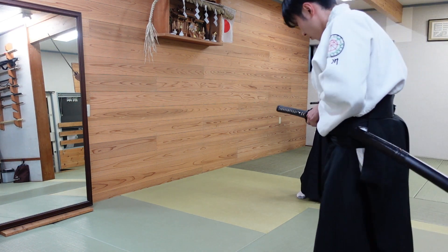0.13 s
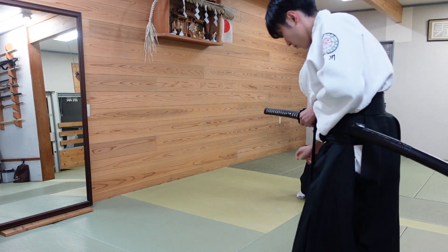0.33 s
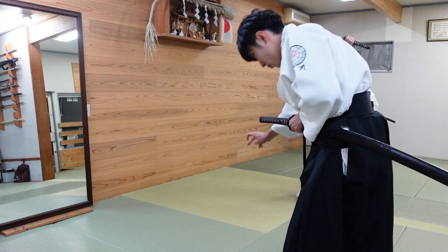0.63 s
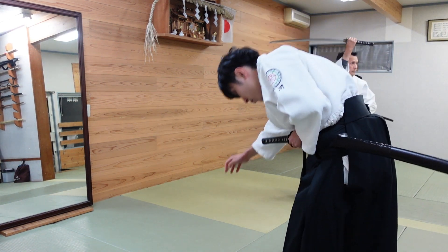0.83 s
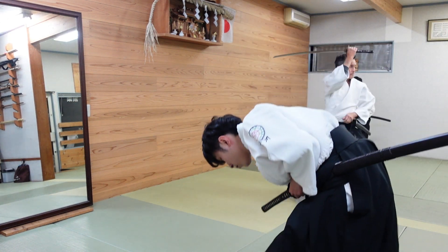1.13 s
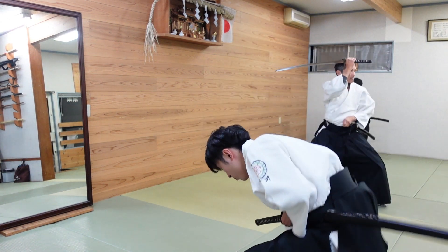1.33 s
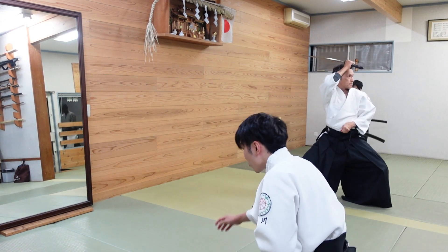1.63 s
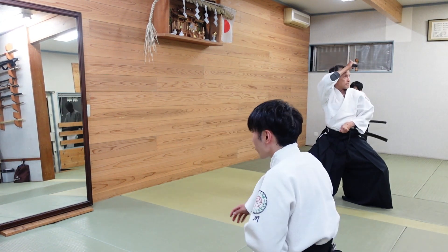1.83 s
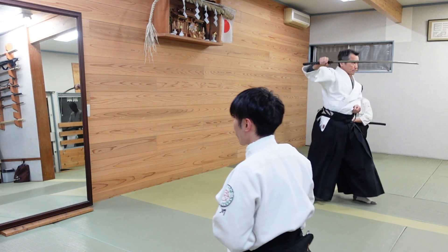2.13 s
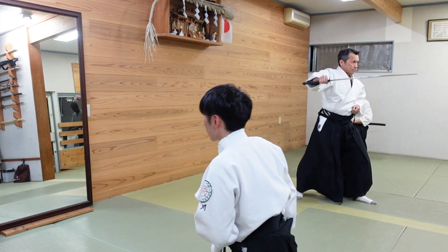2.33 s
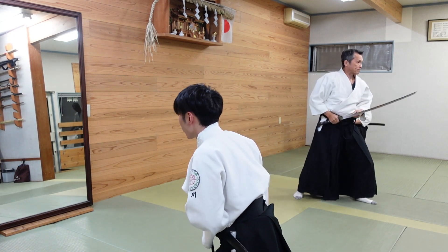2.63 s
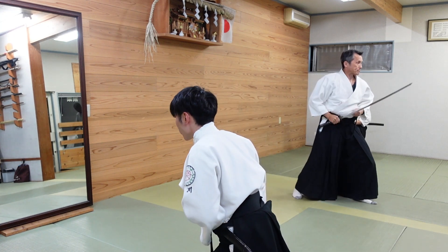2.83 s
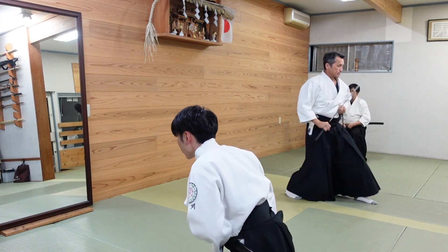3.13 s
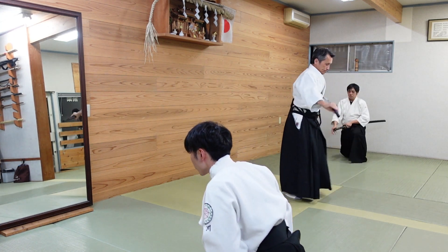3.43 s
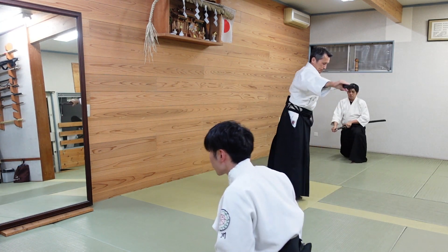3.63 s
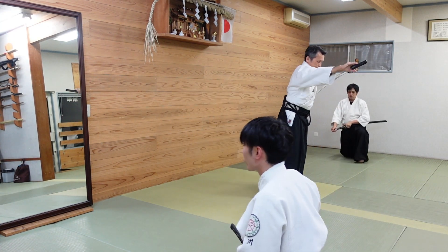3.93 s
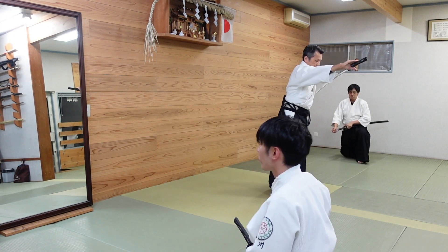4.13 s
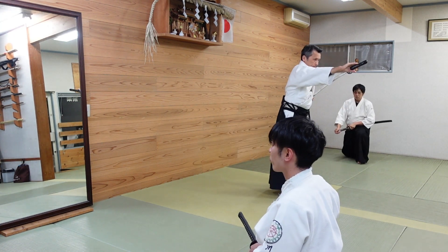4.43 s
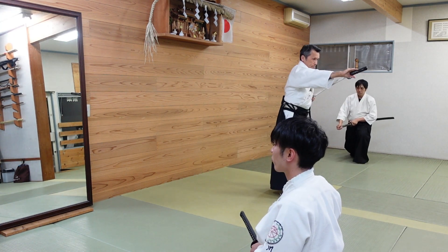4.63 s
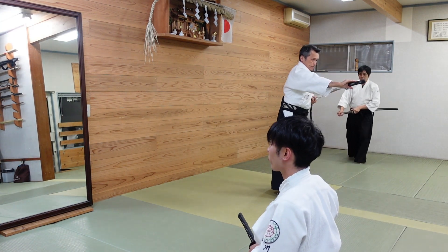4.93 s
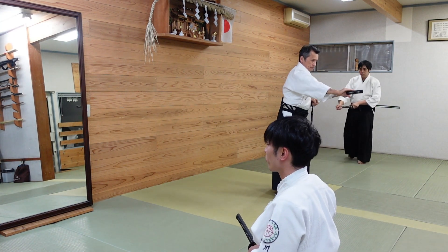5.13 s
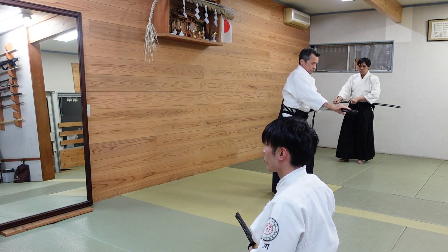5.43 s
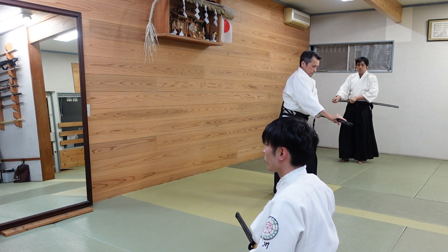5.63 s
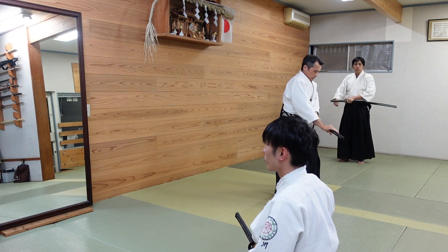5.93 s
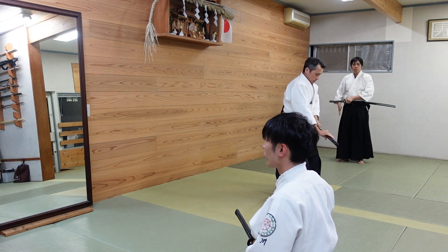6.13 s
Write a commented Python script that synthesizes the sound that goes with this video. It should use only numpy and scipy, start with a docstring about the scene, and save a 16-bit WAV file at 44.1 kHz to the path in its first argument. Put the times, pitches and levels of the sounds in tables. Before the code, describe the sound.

Close stereo pickup of sword practice on mats: small ticks and foot scuffs, a brief metallic chatter, then billowing trousers and a muffled body landing. A hissing foot slide, a sharper blade scrape with a fading metallic rasp, and a strong mat slide come next. Soft cloth flapping, quiet gaps and a final swish with padded pats end it, over low airy ventilation in a small live room.

```python
"""Feet hiss over woven mats and cloth rustles, as sword practice goes on in a small, quiet training hall.
Wide trousers flap, sleeves swish and bodies land softly: grainy noise or filtered bumps, swelling and fading.
A blade scrapes and ticks at its scabbard: chattering noise through metal resonances, cracks, a short squeak.
Low room modes and a brief stereo tail make the hall; filtered noise and a faint hum are its ventilation."""
import sys
import numpy as np
from scipy import signal
from scipy.fft import rfft, irfft, next_fast_len
from scipy.io import wavfile
from scipy.ndimage import uniform_filter1d

SR = 44100
rng = np.random.default_rng(int(sys.argv[2]) if len(sys.argv) > 2 else 0)


def dump_mix(stems):
    """Bounce the given channels to the path in sys.argv[1] as a 16-bit WAV at rate SR."""
    frames = np.atleast_2d(stems).T  # one column per channel
    limited = np.clip(frames, -1, 1)  # hard clip at full scale
    pcm = np.round(limited * 32767).astype(np.int16)
    wavfile.write(sys.argv[1], SR, pcm)


N = 277830
TIME = np.arange(N) / SR   # s
STROKE_TIME = np.arange(2 ** 15) / SR   # time axis of one movement, s
STROKE_SIZE = len(STROKE_TIME)
# spectrum of cloth rubbing on cloth: hz, level_db (per Hz)
CLOTH_SPECTRUM = [(240, -46), (400, -30), (481, -36), (643, -19), (900, -11), (2190, 3.5), (2360, -0.5),
                  (2790, 1.5), (7320, -4), (15500, -19.5)]


def from_db(db):
    """Decibels to gain."""
    return 10 ** (np.asarray(db) / 20)


def rms_one(x):
    """Scale to unit power."""
    return x / np.sqrt(np.mean(x ** 2) + 1e-20)


def at_hz(points, hz):
    """Read a table on a log-frequency axis."""
    table_hz, values = np.transpose(points)
    return np.interp(np.log(hz + 1), np.log(table_hz), values)


def gain_curve(rows):
    """Gain at every sample from (s, dB) rows."""
    return from_db(np.interp(TIME, *np.transpose(rows)))


def shaped(x, spectrum, tilt_db=0):
    """Give a noise a spectrum, tilted in the treble by about so many dB per octave."""
    size = next_fast_len(len(x))
    hz = np.arange(size // 2 + 1) * SR / size
    level_db = at_hz(spectrum, hz) + tilt_db * np.log2(1 + hz / 1000)
    return irfft(rfft(x, size) * from_db(level_db), size)[:len(x)]


def resonance(x, hz, width_hz):
    """Two-pole resonance with about unit gain on top."""
    r = np.exp(-np.pi * width_hz / SR)
    feed = np.array([1, 0, -1]) * (1 - r * r) / 2
    return signal.lfilter(feed, [1, -2 * r * np.cos(2 * np.pi * hz / SR), r * r], x)


def resonances(x, modes):
    """Sum of parallel resonances from (Hz, width Hz, dB) rows."""
    return sum(from_db(db) * resonance(x, hz, width_hz) for hz, width_hz, db in modes)


def band_filter(low_hz, high_hz):
    """Gentle band-pass filter."""
    return signal.butter(2, [low_hz, high_hz], "band", fs=SR, output="sos")


def add(track, s, sound):
    """Mix a sound into a track from time s on."""
    start = max(int(s * SR), 0)
    track[start:start + len(sound)] += sound[:N - start]


def friction(size, per_s, grain_db):
    """Countless fibres slip as a smooth hiss; at random a thread catches and lets go with a snap."""
    snaps = (rng.random(size) < per_s / SR) * rng.standard_normal(size)
    return rms_one(rng.standard_normal(size) + from_db(grain_db) * rms_one(snaps))


def stroke(swell_s, fade_s):
    """Speed of one movement: it builds up in a straight line, then eases off along a bell curve."""
    swell_s, fade_s = max(swell_s, 1e-3), max(fade_s, 1e-3)
    build_up = np.minimum(STROKE_TIME / swell_s, 1)
    easing = np.minimum(np.maximum(STROKE_TIME - swell_s, 0) / fade_s, 9)
    return build_up * np.exp(-easing ** 2)


def rub_stroke(swell_s):
    """Speed of a rubbing movement: one that gathers speed slowly also eases off slowly."""
    shortest_fade_s, fade_per_swell = 0.024, 2.04
    return stroke(swell_s, shortest_fade_s + fade_per_swell * swell_s)


def spread(mid, side, width_db):
    """Diffuse sound at two close microphones: alike in the bass, wider in the treble."""
    # stereo width: hz, side_minus_mid_db (before width_db is added)
    width_curve = [(60, -24), (130, -22), (250, -13.5), (500, -7), (1000, -7), (2200, -6.5), (4400, -7),
                   (8000, -7), (15000, -6.5)]
    return mid + from_db(width_db) * shaped(side, width_curve) * np.array([[1], [-1]])


def flaps():
    """A falling panel of cloth pushes air in a dull, lumpy puff while its folds rub."""
    # heavy cloth billowing and settling on the mat: start_s, swell_s, air_push_db, push_centre_hz, rubbing_db
    billows = [(1.135, 0.027, -33, 860, -34), (1.18, 0.029, -27, 550, -30), (1.385, 0.017, -41.5, 405, -39),
               (1.569, .014, -29.5, 970, -35), (2.167, 0.0068, -36, 1500, -25),
               (3.995, .017, -31.5, 530, -31), (4.035, 0.013, -27.5, 534, -32.5),
               (4.07, 0.016, -41, 454, -38.5)]
    fade_per_swell = 1.75   # cloth takes this much longer to settle than to billow
    dull = band_filter(230, 1800)
    out = np.zeros(N)
    for s, swell_s, push_db, hz, rub_db in billows:
        push = resonance(friction(STROKE_SIZE, per_s=300, grain_db=3.0), hz, 1.08 * hz)
        push = signal.sosfilt(dull, push)
        rub = shaped(friction(STROKE_SIZE, per_s=680, grain_db=-7.0), CLOTH_SPECTRUM, tilt_db=0.4)
        cloth = from_db(push_db) * rms_one(push) + from_db(rub_db) * rms_one(rub)
        add(out, s, stroke(swell_s, fade_per_swell * swell_s) * cloth)
    return out


def slides():
    """A sole drags over the ribs of the mat; the hiss gathers round a centre pitch given for each slide."""
    # feet sliding over the weave: start_s, swell_s, level_db, hiss_centre_hz
    drags = [(0.0, 0.003, -34, 1750), (.043, .004, -36, 1850), (.281, .004, -44.5, 2860),
             (2.043, 0.0089, -33, 5350), (2.091, 0.012, -30.5, 4800), (2.128, 0.027, -25.5, 3800),
             (2.145, 0.029, -37, 1660), (2.914, 0.0093, -30.5, 3100), (2.939, 0.003, -38.5, 1040),
             (3.277, 0.033, -21.5, 2600), (3.334, .014, -24.5, 2260), (3.481, 0.012, -34.5, 1348)]
    # spectrum of the slide hiss: hz, level_db (per Hz)
    hiss_spectrum = [(240, -47), (450, -45), (700, -24), (900, -6.5), (1300, -8), (2600, -12), (4400, -8.5),
                     (7000, -8), (10000, -14.5), (15500, -25)]
    # narrow resonances colouring the slide hiss: pitch_hz, width_hz, level_db
    hiss_modes = [(1435, 78, 4), (1635, 150, 4.5), (1830, 120, 6), (2236, 87, 4.5), (2490, 260, 2.5),
                  (2760, 110, -19), (3070, 110, -5), (3950, 110, -10), (4250, 100, -11.5)]
    # a lower hiss is more focused: emphasis of its centre at 2 kHz, and the change per octave
    focus_at_2k_db, focus_db_per_octave = 6, -5
    out = np.zeros(N)
    for s, swell_s, db, hz in drags:
        focus_db = focus_at_2k_db + focus_db_per_octave * np.log2(hz / 2000)
        hiss = shaped(friction(STROKE_SIZE, per_s=1200, grain_db=-3.5), hiss_spectrum)
        hiss = hiss + resonances(hiss, hiss_modes)
        centre = resonance(resonance(hiss, hz, 0.59 * hz), hz, 1.62 * hz)
        hiss = rms_one(hiss) + from_db(focus_db) * rms_one(centre)
        add(out, s, from_db(db) * rub_stroke(swell_s) * rms_one(hiss))
    return out


def swishes():
    """Cotton brushing on cotton: broad, finely grained friction noise, each brush with its own brightness."""
    # sleeves and jackets brushing: start_s, swell_s, level_db, brightness_db_per_octave
    brushes = [(.086, 0.0022, -35, 10), (1.127, 0.0089, -35, 9), (1.54, .004, -32, -0.5),
               (1.68, 0.01, -36, 2), (1.923, 0.0032, -42, 2), (2.679, 0.007, -38.5, -16),
               (2.759, 0.014, -40, -7.5), (3.883, 0.0067, -35.5, 9), (4.345, 0.011, -39.5, 4.5),
               (5.081, 0.0046, -41.5, -3), (5.277, 0.02, -25.5, 1), (5.31, 0.039, -29.5, 1.3)]
    out = np.zeros(N)
    for s, swell_s, db, tilt_db in brushes:
        hiss = shaped(friction(STROKE_SIZE, per_s=920, grain_db=-2.0), CLOTH_SPECTRUM, tilt_db)
        add(out, s, from_db(db) * rub_stroke(swell_s) * rms_one(hiss))
    return out


def scrapes():
    """The blade chatters along the scabbard mouth, and the chatter drives that sword's resonances."""
    # a blade rubbing or rattling in its scabbard:
    # start_s, fade_s, level_db, brightness_db_per_octave, sword (0 or 1)
    rubs = [(.475, 0.03, -24.5, 5.5, 0), (.498, 0.019, -23.5, 3.5, 0), (.525, 0.037, -32.5, 1, 0),
            (2.678, 0.02, -32, 3.5, 1), (2.775, 0.047, -38, 3.5, 1), (3.159, .022, -21, -2, 1),
            (3.185, 0.26, -29.5, -2.5, 1)]
    # spectrum of the rasp: hz, level_db (per Hz)
    rasp_spectrum = [(710, -51), (1200, -22), (1650, -3.5), (3350, -5), (3690, -8), (6110, 2), (7570, -8.5),
                     (10100, -6), (15500, -40)]
    # resonances of the two swords, one list each: pitch_hz, width_hz, level_db
    sword_modes = [
        [(1684, 40, -5.5), (2580, 44, -11), (3330, 82, 4.5), (3600, 110, 1.5), (3830, 73, 5), (4960, 40, 4),
         (5460, 50, -12), (5300, 30, 4), (5884, 50, 10), (5910, 55, 1), (6600, 45, -1), (8140, 80, -8),
         (8430, 250, -4), (9300, 60, -13), (9850, 46, -1), (10400, 110, -11), (11160, 80, -19)],
        [(2000, 31, -1), (3020, 150, 2.5), (3450, 100, 6), (4240, 140, 2.5), (4640, 72, -2), (5300, 38, -6),
         (6150, 78, -14), (6750, 55, -25), (9800, 110, -26), (11200, 80, -8)],
    ]
    swell_s = 0.0038
    out = np.zeros(N)
    for s, fade_s, db, tilt_db, sword in rubs:
        chatter = friction(STROKE_SIZE, per_s=680, grain_db=0.5)
        ring = resonances(chatter, sword_modes[int(sword > .5)])
        rasp = shaped(chatter, rasp_spectrum)
        metal = rms_one(rasp) + from_db(1) * rms_one(ring)
        metal = shaped(metal, [(1, 0)], tilt_db)   # flat spectrum, tilted only
        add(out, s, from_db(db) * stroke(swell_s, fade_s) * rms_one(metal))
    return out


def ticks():
    """Each tick is a noise crack of a millisecond or so through a broad resonance."""
    # sword fittings and snapping folds: start_s, peak_db, centre_hz
    cracks = [(.022, -17, 2930), (.047, -13.5, 1660), (0.0874, -16.5, 2780), (1.543, -15.5, 3330),
              (1.571, -15, 1220), (1.599, -23, 1430), (2.096, -15.5, 4000), (2.176, -12.5, 3750),
              (3.171, -15, 3900), (3.357, -14, 2500)]
    decay_s = 0.0018
    out = np.zeros(N)
    for s, db, hz in cracks:
        crack = rng.standard_normal(STROKE_SIZE) * np.exp(-np.minimum(STROKE_TIME / decay_s, 60))
        crack = resonance(resonance(crack, hz, 1.0 * hz), hz, 0.94 * hz)
        add(out, s, from_db(db) * crack / np.abs(crack).max())
    return out


def squeak(s=1.125, swell_s=0.002, fade_s=0.0273, hz=5650, end_hz=5270, level_db=-26):
    """A brief stick-slip squeak of the sword gear as its wearer kneels: a rough, jittered tone that sags."""
    out = np.zeros(N)
    sag_hz = np.interp(STROKE_TIME, [0, swell_s + fade_s / 2], [hz, end_hz])
    pitch_hz = sag_hz * (1 + 0.34 * rng.standard_normal(STROKE_SIZE))   # jitter on every sample
    tone = np.sin(2 * np.pi * np.cumsum(pitch_hz) / SR)
    add(out, s, from_db(level_db) * stroke(swell_s, fade_s) * tone)
    return resonance(out, hz, hz)


def pats():
    """Padded contacts give a short, hollow sound with little treble: noise through two resonances."""
    # soft pats of foot and hand: start_s, fade_s, level_db, pitch_hz
    contacts = [(.086, 0.013, -35.5, 1000), (.086, 0.033, -45, 595), (2.68, 0.1, -52, 675),
                (3.345, 0.039, -44, 770), (5.259, 0.0078, -32.5, 990), (5.285, 0.037, -47.5, 430),
                (5.301, 0.011, -27.5, 990)]
    swell_s = 0.005
    out = np.zeros(N)
    for s, fade_s, db, hz in contacts:
        hollow = resonance(resonance(rng.standard_normal(STROKE_SIZE), hz, .5 * hz), hz, 0.26 * hz)
        add(out, s, from_db(db) * stroke(swell_s, fade_s) * rms_one(hollow))
    return out


def thumps():
    """The mat is a damped cushion: weight on it gives a brief, low bump about half an octave wide."""
    # body weight landing on the mat: start_s, swell_s, level_db, pitch_hz
    landings = [(1.178, 0.024, -43.5, 177), (1.18, .02, -57, 85), (1.194, 0.013, -33.5, 330),
                (1.571, .006, -48.5, 221), (1.648, 0.0042, -49, 276), (4.02, 0.013, -50, 345),
                (4.025, 0.011, -57, 62)]
    fade_s = 0.03
    out = np.zeros(N)
    for s, swell_s, db, hz in landings:
        cushion = band_filter(hz / 2 ** .25, hz * 2 ** .25)
        force = rng.standard_normal(STROKE_SIZE)
        bump = signal.sosfilt(cushion, force * stroke(swell_s, fade_s))
        steady_level = np.std(signal.sosfilt(cushion, force))
        add(out, s, from_db(db) * bump / steady_level)
    return out


def activity():
    """Strength of the rustle: it builds up to each shift of the body, then settles; overlaps add in power."""
    # turning, kneeling, rising, stepping: height_s (time of the peak), rustle_db, build_up_db_per_s
    body_shifts = [(0.0, -47, 40), (1.48, -39, 15.5), (2.18, -39, 31), (3.3, -38.5, 14.5), (3.97, -41, 85),
                   (5.3, -44, 17.5)]
    settle_db_per_s = 35.5
    strengths = []
    for s, db, build_db_per_s in body_shifts:
        drop_db = np.maximum(build_db_per_s * (s - TIME), settle_db_per_s * (TIME - s))
        strengths.append(from_db(db - drop_db))
    return np.linalg.norm(strengths, axis=0)


def rustle():
    """Folds shift and crinkle unevenly around each shift of the body: friction noise of wavering level."""
    # spectrum of shifting folds: hz, level_db (per Hz)
    fold_spectrum = [(180, -31), (300, -18.5), (372, -12.5), (484, -11.5), (720, -2), (1110, -4.5),
                     (2610, 0), (3070, 2), (9760, -5), (15500, -15)]
    unrest = uniform_filter1d(rng.standard_normal(N), SR // 70)
    unrest = rms_one(uniform_filter1d(unrest, SR // 70))
    crinkle = from_db(1.8 * unrest)
    folds = rms_one(shaped(friction(N, per_s=290, grain_db=-9.0), fold_spectrum))
    return activity() * crinkle * folds


def reflections():
    """Stereo response of the hall from one place: it builds up in milliseconds and dies band by band."""
    # time to decay by 60 dB: hz, decay_s
    decay_times = [(150, 0.4), (500, 0.49), (1500, 0.57), (4000, 0.46), (8000, 0.7), (15000, 0.27)]
    edges_hz = np.geomspace(60, 18000, 9)
    white, tail = rng.standard_normal((2, 2, STROKE_SIZE)), 0
    for k, (low, high) in enumerate(zip(edges_hz, edges_hz[1:])):
        band = signal.sosfilt(band_filter(low, high), white[k % 2])
        decay_s = at_hz(decay_times, np.sqrt(low * high))
        tail = tail + band * np.exp(-np.log(1000) * STROKE_TIME / decay_s)
    # even out the tail's level across pitch
    spectrum = rfft(tail * (1 - np.exp(-STROKE_TIME / .005)))
    energy = uniform_filter1d(np.abs(spectrum) ** 2, size=60)
    tail = irfft(spectrum / np.sqrt(energy + 1e-6))
    return spread(*tail, width_db=2.0)[:, :STROKE_SIZE * 3 // 4]


def hall(dry, direct_db=-3, echo_db=-3):
    """A few low modes boom; the rubbing spot keeps moving, so sound shifts between two sets of reflections."""
    # low resonances of the hall: pitch_hz, width_hz, level_db
    room_modes = [(170, 50, 0), (261, 47, -3.5), (313, 73, -16), (494, 45, -2), (605, 47, -13),
                  (788, 25, -5.5), (1090, 67, -12.5)]
    dry = dry + resonances(dry, room_modes)
    place = 2 * np.pi * 12 * TIME   # 12 turns per second
    echo = 0
    for share in (np.cos(place), np.sin(place)):
        echo = echo + signal.fftconvolve((share * dry)[None], reflections(), axes=1)[:, :N]
    return from_db(direct_db) * dry + from_db(echo_db) * echo


def air():
    """Diffuse noise of the ventilation, with a few duct resonances and a faint low hum."""
    # ventilation and room noise, a little quieter at first: time_s, level_db
    level_curve = [(0, -51), (1.6, -48), (6.3, -46.5)]
    # spectrum of the broad noise: hz, level_db (per Hz)
    air_spectrum = [(15, -60), (25, -35), (59, -24), (86, -26), (116, -18), (300, -12), (500, -12.5),
                    (750, -9), (1400, -8), (2000, -8.5), (2600, -11), (4000, -10.5), (7300, -13.5),
                    (15500, -25.5)]
    # narrow bands in the noise: centre_hz, width_hz, level_db (against the broad noise)
    duct_bands = [(950, 450, -12.5), (1554, 120, -10), (1900, 170, -14), (3050, 110, -31)]
    channels = []
    for white in rng.standard_normal((2, N)):
        noise = rms_one(shaped(white, air_spectrum))
        for hz, width_hz, db in duct_bands:
            noise = noise + from_db(db) * rms_one(resonance(rng.standard_normal(N), hz, width_hz))
        channels.append(noise)
    mid, side = channels
    hum = from_db(-41) * np.sin(2 * np.pi * 59.5 * TIME)   # level against the broad noise
    return gain_curve(level_curve) * (spread(mid, side, width_db=4.5) + hum)


def scene():
    """All movements sound through the hall, over its ventilation noise."""
    cloth = flaps() + swishes() + rustle()
    feet_and_bodies = slides() + pats() + thumps()
    swords = scrapes() + ticks() + squeak()
    return hall(cloth + feet_and_bodies + swords) + air()


def record(dry):
    """The recorder cuts the top steeply."""
    cutoff_hz = 15850
    return signal.sosfilt(signal.ellip(12, .2, 80, cutoff_hz, fs=SR, output="sos"), dry)


dry = scene()
out = record(dry)
dump_mix(out)
```